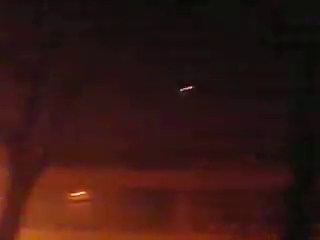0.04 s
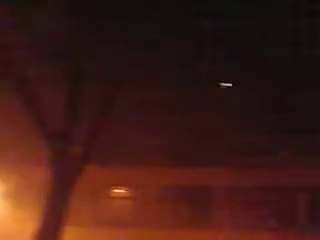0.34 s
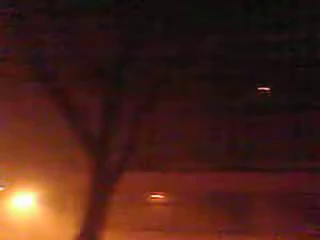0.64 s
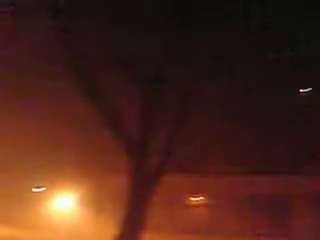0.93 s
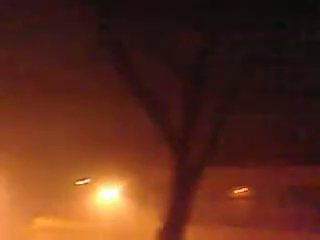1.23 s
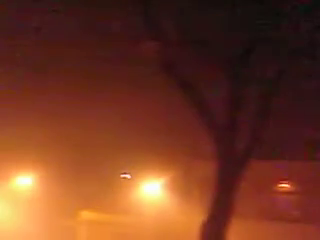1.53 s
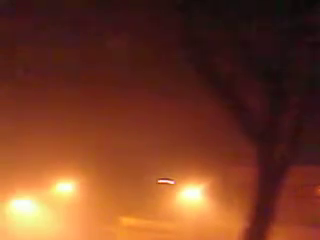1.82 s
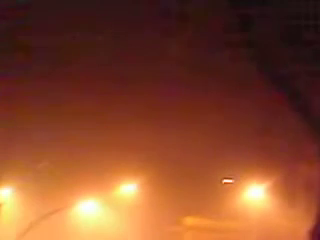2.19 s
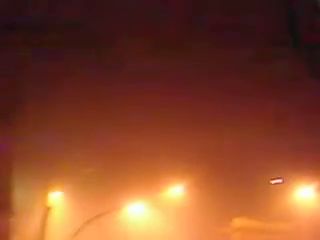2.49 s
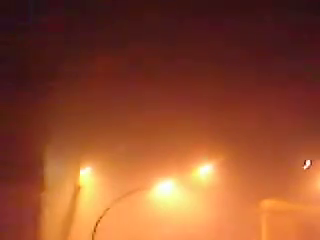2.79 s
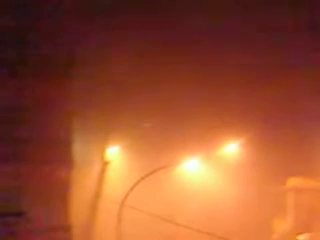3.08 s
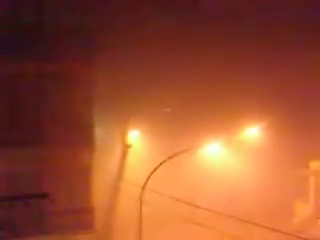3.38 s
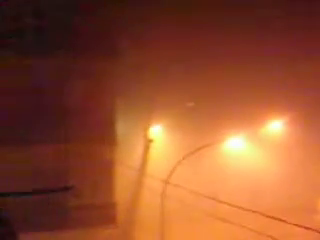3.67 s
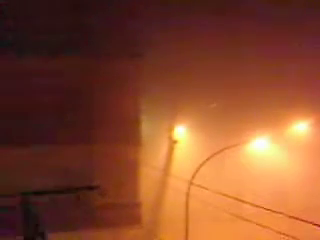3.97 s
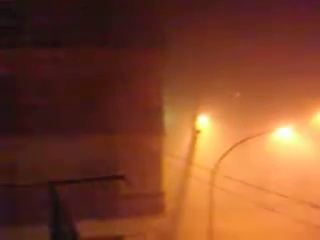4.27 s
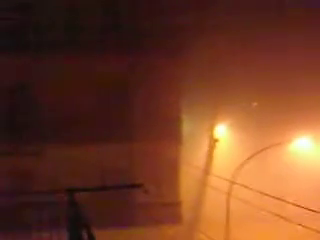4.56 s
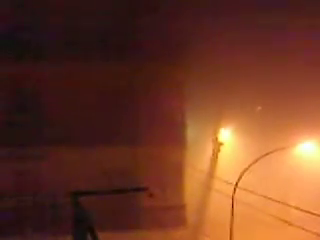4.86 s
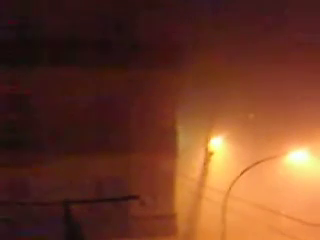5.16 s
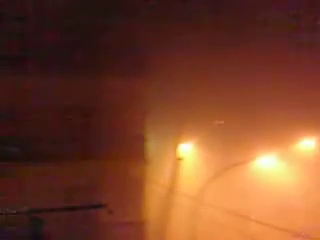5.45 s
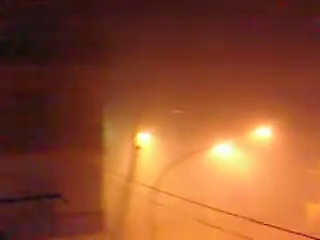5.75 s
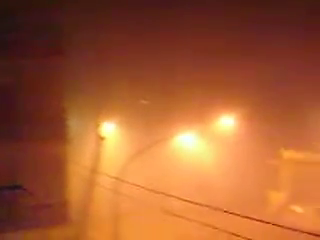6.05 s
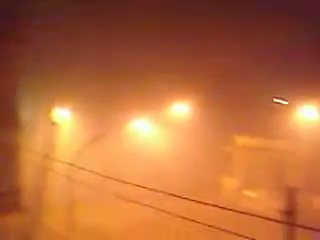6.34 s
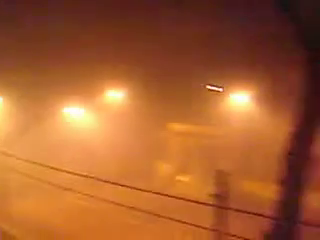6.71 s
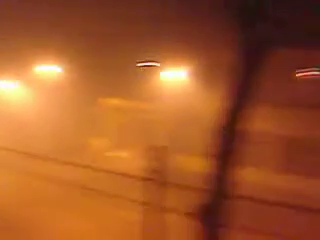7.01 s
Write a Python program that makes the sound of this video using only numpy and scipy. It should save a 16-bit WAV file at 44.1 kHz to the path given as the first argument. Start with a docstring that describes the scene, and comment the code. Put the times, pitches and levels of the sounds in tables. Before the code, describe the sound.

Countless distant fireworks merge into an unbroken barrage of crackles, thuds and low booms. Over it, close firecrackers bang at irregular moments, often in quick clusters, slapping back from the houses, while rockets crack overhead. Near the end a shell fizzes briefly and the close bangs crowd together. The street is heard through a small, dull microphone that distorts and dips after loud bangs.

```python
"""Fireworks on a foggy night

Countless far bangs from all over town merge into a rolling barrage. Rockets crack overhead,
firecrackers burst close by and slap back from a house front, and one near shell fizzes.
A small camera with little treble ducks after every loud bang, recovers slowly and clips the peaks."""
import sys
import numpy as np
from scipy import signal
from scipy.io import wavfile
from scipy.ndimage import uniform_filter1d

SR = 44100
rng = np.random.default_rng(int(sys.argv[2]) if len(sys.argv) > 2 else 0)


def transcribe(u):
    """Save the signal u as a 16-bit wav file named by the first command-line argument.

    u: samples, shape (n,) or (channels, n), limited to [-1, 1]; the rate is SR.
    q: integer samples, one column per channel.
    """
    v = np.clip(np.atleast_2d(u).T, -1, 1)
    q = np.round(v * 32767).astype(np.int16)
    wavfile.write(sys.argv[1], SR, q)


N = 314433

# The tone of the far bangs. Each row: frequency in Hz, level in dB.
TOWN_TONE = [(20, -17), (50, -15), (100, -9.5), (170, -2.5), (300, -1), (600, 1), (850, -3.5), (1400, -7),
             (2500, -14), (3300, -14), (4000, -20.5), (5000, -41)]
# The barrage's bass, booms of far shells. Each row: time in seconds, level in dB.
BOOM_LEVELS = [(0, -20.5), (.7, -25.5), (.9, -29), (1.08, -28), (1.25, -19.5), (1.78, -18.6), (2.2, -21.3),
               (2.75, -25.5), (3.1, -20.5), (3.7, -23.5), (4.45, -22), (4.65, -26.5), (5.35, -25.5),
               (5.75, -21.5), (6.05, -22.5), (6.45, -24.5), (6.8, -21.5), (7.13, -23)]
# Its middle, strings of firecrackers in the next streets. Each row: time in seconds, level in dB.
STRING_LEVELS = [(0, -13.5), (.2, -20.5), (.4, -18.5), (1.08, -25.5), (1.25, -18), (1.55, -19.5),
                 (2.7, -22), (2.95, -17), (3.249, -18.5), (4.15, -20), (4.78, -16.5), (5.35, -21),
                 (5.62, -16.5), (5.9, -19), (6.15, -16), (6.45, -22.5), (6.65, -19), (7.13, -20)]
# Its treble, crackling firework stars. Each row: time in seconds, level in dB.
STAR_LEVELS = [(0, -20), (.5, -25.5), (1.08, -28.5), (1.35, -21), (1.58, -22.5), (1.95, -19.5), (2.55, -28),
               (2.95, -21), (3.2, -25), (3.75, -21.5), (4.15, -25), (4.65, -20.5), (5.35, -25.5),
               (5.8, -18.5), (6, -20.5), (6.239, -18), (6.42, -23), (7.13, -25.5)]
# Rockets overhead. Each row: start in seconds, level in dB, pitch in Hz, seconds to fade by 60 dB.
ROCKET_BURSTS = [(.048, -19, 1500, 0.67), (.094, -1.5, 1980, 0.023), (.346, -17, 1580, 0.25),
                 (.633, -8.5, 1230, .07), (1.76, -15, 1810, 0.45), (1.793, -7, 1150, .06),
                 (2.18, -10.5, 1100, 0.056), (2.641, -6.5, 1250, .09), (2.945, -15.5, 1500, 0.19),
                 (3.24, -6.5, 2100, .026), (3.695, -17.5, 2300, 0.082), (4.218, -18, 1900, .12),
                 (4.473, -4, 1050, 0.17), (4.785, -15.5, 1200, 0.21), (5.082, -1, 1500, .04),
                 (5.304, -17.5, 2500, .13), (5.681, -8.5, 1600, 0.063), (5.83, -19.5, 2040, 0.17),
                 (6.109, -16.5, 1400, 0.18), (6.237, -10.5, 2000, .1), (6.347, -10, 2000, 0.086),
                 (6.588, -12, 1500, .09), (6.764, -11, 1700, 0.1), (7.017, -7.5, 1500, .028)]
# How long the street echoes. Each row: frequency in Hz, seconds to fade by 60 dB.
STREET_FADES = [(100, 0.25), (500, 1), (1500, 0.52), (4000, 0.31)]
# Close firecrackers. Each row: start in seconds, peak in dB, place from 0 (open street) to # 1 (house front),
# level of the sound the street scatters back in dB relative to the peak. # The row at 4.034 s is not a burst of
# its own but a second slap-back of the bang at 4.009 s.
CLOSE_CRACKERS = [(0.1406, 3, 0.062, -25), (0.2455, -4.5, 0.92, -16.5), (0.6092, -0.7, 0, -20),
                  (0.7138, -2, 0.22, -14), (0.7519, 3.5, 0.9, -8.5), (0.9102, 1, 0.68, -8),
                  (1.0737, -2, 0, -15), (1.1783, -2.5, 0.76, -11), (1.4282, 0.7, 0.051, -23.5),
                  (1.5324, 0, 0.48, -16.5), (2.0881, 0.5, 0.42, -26.5), (2.1747, -0.5, 0.1, -3.5),
                  (2.3114, 4, 0.083, -4.5), (2.3178, 3, 0.61, -11.5), (2.5859, -2.5, 0, -28),
                  (2.6286, -0.5, 0.36, -0.5), (3.0661, -7.5, .1, -24), (3.1704, 0, 0.88, -19.5),
                  (3.5736, -1, 0.66, -7), (4.0093, 3.5, 0.15, -13.5), (4.0337, -0.5, .55, -17.5),
                  (4.1135, 3, 0.58, -12.5), (4.442, -4.5, 0.59, -21), (4.4492, -3.5, 0, -23),
                  (4.47, 3, 0.41, -2), (4.972, -2.5, 0.96, -14.5), (5.2259, -1, 0.79, -17),
                  (5.8399, 2.5, 0.18, 0.5), (6.3034, 0.5, 0.064, -24), (6.3427, 3, 0.55, -6),
                  (6.408, 3, 0.82, -10), (6.6949, -3, 0.091, -18), (6.7493, 0.5, 0.2, -9.5),
                  (6.7785, -2, 0, -10), (6.8863, -5.5, 1, -7.5), (6.8961, -0.5, 0, -2),
                  (6.9631, -1.5, 0, -10), (7.0484, -0.8, 0.32, -11), (7.0581, 3, 0.86, -8)]

MIC_TOP_HZ = 4200  # the microphone passes little above this


def amp(db):
    """Turns decibels into a number to multiply by."""
    return 10 ** (np.asarray(db) / 20)


def evened(x):
    """Scales a sound to an average (rms) level of 1."""
    return x / np.sqrt(np.mean(x ** 2) + 1e-20)


def look_up(table, hz):
    """Reads between a table's rows, with the octaves evenly spaced."""
    row_hz, values = np.transpose(table)
    return np.interp(np.log(hz + 1), np.log(row_hz + 1), values)


def add(mix, start_s, sound):
    """Mixes a sound in at its start time."""
    part = mix[max(round(start_s * SR), 0):][:len(sound)]
    part += sound[:len(part)]


def ring(x, hz, q):
    """Keeps the sound around one pitch; a higher q makes the band narrower."""
    return signal.lfilter(*signal.iirpeak(hz, max(q, hz / SR * 8), SR), x)


def lowpass(x, hz, size):
    """Cuts the sound above hz steeply, without delaying it."""
    return signal.oaconvolve(x, signal.firwin(size, hz, window=("kaiser", 8), fs=SR), "same")


def colour(x, gain, size=4096):
    """Scales each frequency by gain(hz). Nothing rings ahead of a bang, so it stays sharp."""
    hz = abs(np.fft.fftfreq(size, 1 / SR))
    log_gain = np.log(np.maximum(gain(hz), 1e-5))
    taps = np.fft.ifft(np.exp(np.conj(signal.hilbert(log_gain)))).real
    return signal.oaconvolve(x, taps[:size // 2])[:len(x)]


def smooth(x, lag_s):
    """Spreads every sudden jump into a fading tail."""
    kept = np.exp(-1 / (lag_s * SR))
    return signal.lfilter([1 - kept], [1, -kept], x)


def random_bangs(per_s, spread_db, smear_s, direct, roll_db, roll_s=0.068):
    """Each bang arrives directly, then as a cluster of reflections, then rolls between the houses."""
    sizes = amp(spread_db * np.minimum(rng.exponential(1, N), 3))
    shots = sizes * (rng.random(N) < per_s / SR)
    cluster_power = smooth(shots ** 2, smear_s / 2)  # power fades twice as fast as the wave
    roll_power = smooth((amp(roll_db) * shots) ** 2, roll_s / 2)
    echoes = np.sqrt(cluster_power + roll_power) * rng.standard_normal(N)
    return evened(direct * shots + echoes)


def barrage(boom_hz=300, crackle_hz=1300):
    """The whole town: booms below, thuds from the next streets and crackling stars above."""
    bangs = random_bangs(per_s=460, spread_db=3.5, smear_s=0.017, direct=0.46, roll_db=-2)
    shells = random_bangs(per_s=220, spread_db=5, smear_s=0.0035, direct=0.7, roll_db=-2)
    thuds = random_bangs(per_s=70, spread_db=1, smear_s=0.0069, direct=1.5, roll_db=-6.5)
    stars = random_bangs(per_s=630, spread_db=4, smear_s=0.0082, direct=0.75, roll_db=-3)
    below = lambda hz, edge: 1 / np.sqrt(1 + (hz / edge) ** 8)
    above = lambda hz, edge: np.sqrt(1 - below(hz, edge) ** 2)
    town = lambda hz: amp(look_up(TOWN_TONE, hz))
    din = bangs + 0.41 * ring(thuds, hz=476, q=0.77)
    bass = colour(din + 0.85 * shells, lambda hz: town(hz) * below(hz, boom_hz))
    middle = colour(din, lambda hz: town(hz) * above(hz, boom_hz) * below(hz, crackle_hz))
    treble = colour(bangs + 1.24 * stars, lambda hz: town(hz) * above(hz, crackle_hz))
    t, out = np.arange(N) / SR, np.zeros(N)
    for band, levels in (bass, BOOM_LEVELS), (middle, STRING_LEVELS), (treble, STAR_LEVELS):
        out += amp(np.interp(t, *np.transpose(levels))) * evened(band)
    return out


def rockets():
    """Bursts in the air, smeared by roofs and walls: a short loud rasp if near, a soft roll if far."""
    t, out = np.arange(SR) / SR, np.zeros(N)
    attack = 1 - np.exp(-t / 0.0008)
    for start_s, db, hz, fade_s in ROCKET_BURSTS:
        noise = lowpass(rng.standard_normal(len(t)), MIC_TOP_HZ, size=101)
        rasp = evened(ring(noise, hz, q=1.7))
        add(out, start_s, rasp * attack * amp(db - 60 * t / fade_s))
    return out


def street_echoes(x, echoes_per_s=2500):
    """Sound bounces between the houses, and each frequency fades at its own speed."""
    bounces = rng.standard_normal(SR) * (rng.random(SR) < echoes_per_s / SR)
    hz, t, spectrum = signal.stft(bounces, SR, nperseg=256)
    fade = amp(-60 * t / look_up(STREET_FADES, hz)[:, None])
    build_up = 1 - np.exp(-t / 0.0067)
    tail = signal.istft(spectrum * fade * build_up, SR, nperseg=256)[1]
    return signal.oaconvolve(x, tail / np.linalg.norm(tail))[:N]


def firecrackers(wall_delay_s=0.011):
    """A shock, a suction and one rebound of the microphone; the street and a house throw it back."""
    t, out = np.arange(5000) / SR, np.zeros(N)
    for start_s, peak_db, place, scatter_db in CLOSE_CRACKERS:
        # nearer the house front, the blast is higher and its slap-back louder
        hz = np.interp(place, [0, 1], [352, 532])
        slap_db = np.interp(place, [0, 1], [-23.5, -2])
        shock_age = 2 * np.pi * hz * t * 1.165
        shock = (1 - shock_age) * np.exp(-shock_age)
        swing = ring(shock, hz, q=1.12)
        # the small microphone passes little bass, which makes the suction the deepest swing
        blast = signal.lfilter(*signal.butter(1, hz * 0.7, "high", fs=SR), swing) + 0.012 * shock
        blast *= amp(peak_db) / abs(blast).max()
        noise = lowpass(rng.standard_normal(len(t)), MIC_TOP_HZ, size=101)
        rattle = evened(ring(noise, hz * 1.19, q=1.4))
        scatter = 0.59 * rattle * np.exp(-t / 0.016) * (1 - np.exp(-t / 0.0012))
        add(out, start_s, blast + amp(peak_db + scatter_db) * scatter)
        add(out, start_s + wall_delay_s, amp(slap_db) * blast)
    return out


def fizzing_shell(start_s=6.06, length_s=0.28, rise_s=0.012, fall_s=0.044):
    """A near shell scatters a cloud of tiny pops, which holds briefly and burns out."""
    t = np.arange(N) / SR - start_s
    burning = np.clip(np.minimum(t / rise_s, (length_s - t) / fall_s), 0, 1)
    pops = random_bangs(per_s=500, spread_db=0.5, smear_s=0.0036, direct=0.39, roll_db=1)
    crackle = ring(lowpass(pops, MIC_TOP_HZ, size=101), hz=3080, q=1.1)
    return amp(-20) * burning * evened(crackle)


def limiter(x, limit_db, recovery_db_per_s, attack_s):
    """A bang over the limit quickly pulls the volume down; then it creeps back up."""
    power_db = 10 * np.log10(abs(uniform_filter1d(x ** 2, size=80)) + 1e-12)
    over_db = np.maximum(power_db - limit_db, 0)
    recovery_db = np.arange(N) * recovery_db_per_s / SR
    held_db = np.maximum.accumulate(over_db + recovery_db) - recovery_db
    return x / amp(smooth(held_db, attack_s))


def scene():
    """The close bursts and their street echoes over the barrage of the whole town."""
    near = firecrackers() + rockets()
    return (barrage() + fizzing_shell() + near + amp(-13.5) * street_echoes(near))[None]


def record(dry):
    """The camera cuts the treble, ducks after loud bangs and flattens the peaks twice."""
    dulled = lowpass(dry[0], hz=4700, size=201)
    ducked = limiter(dulled, limit_db=-5.5, recovery_db_per_s=18.5, attack_s=0.0047)
    overloaded = np.clip(ducked, -0.68, 0.7)
    narrow = lowpass(overloaded, MIC_TOP_HZ, size=151)
    flattened = np.clip(narrow, -0.67, 0.75)  # the suction side hits its limit first
    return lowpass(flattened, hz=15800, size=255)[None]


dry = scene()
out = record(dry)
transcribe(out)
```